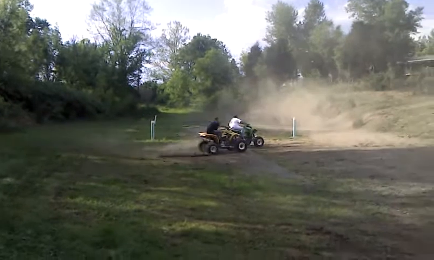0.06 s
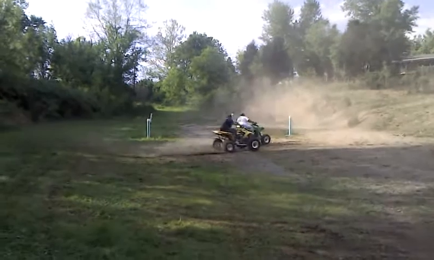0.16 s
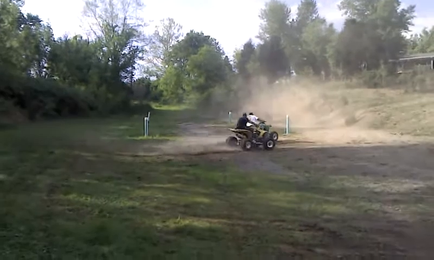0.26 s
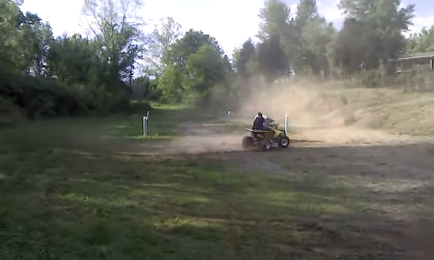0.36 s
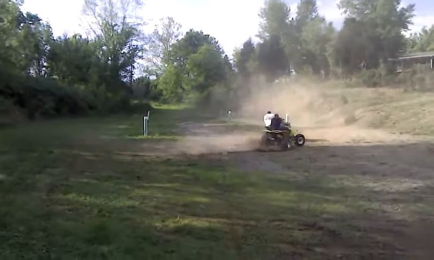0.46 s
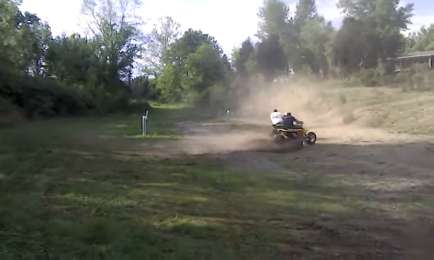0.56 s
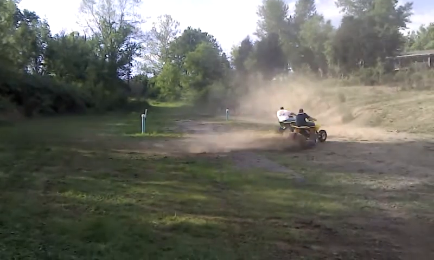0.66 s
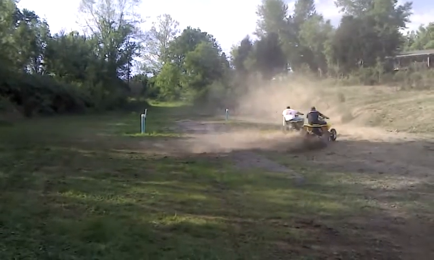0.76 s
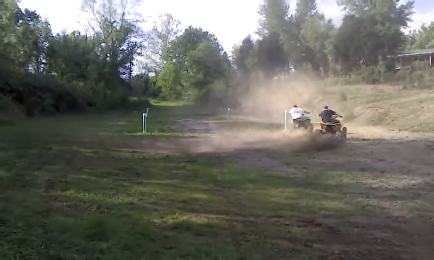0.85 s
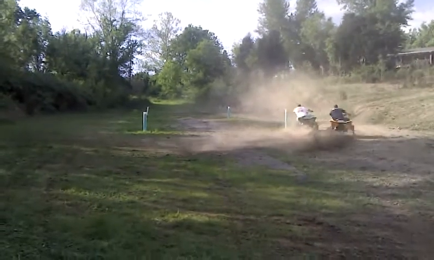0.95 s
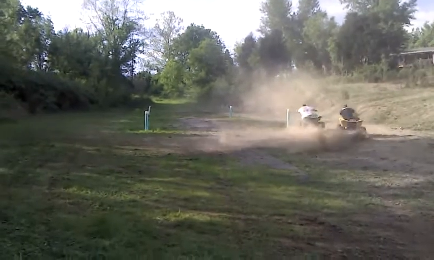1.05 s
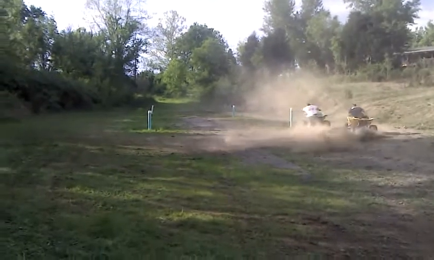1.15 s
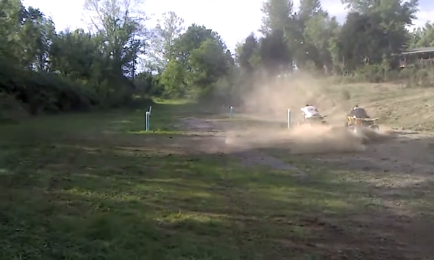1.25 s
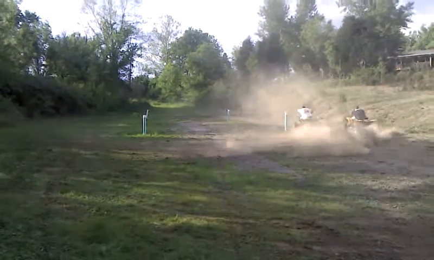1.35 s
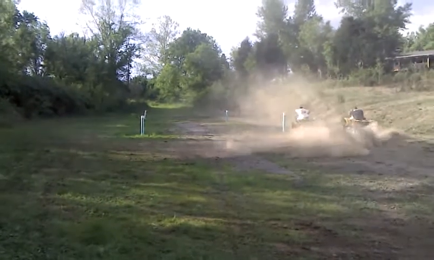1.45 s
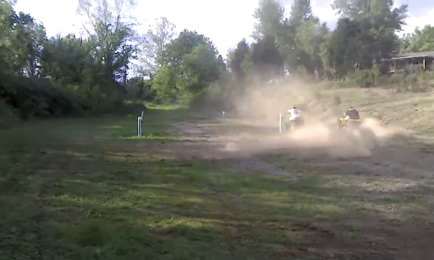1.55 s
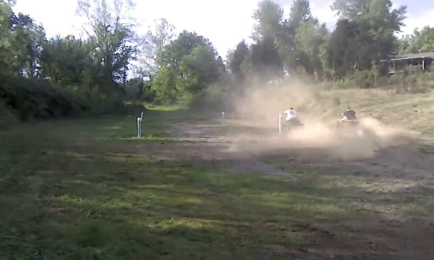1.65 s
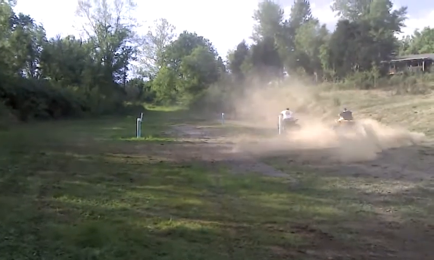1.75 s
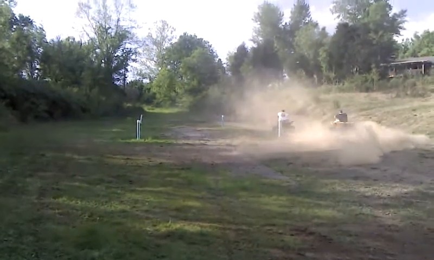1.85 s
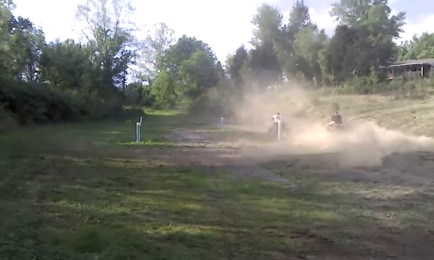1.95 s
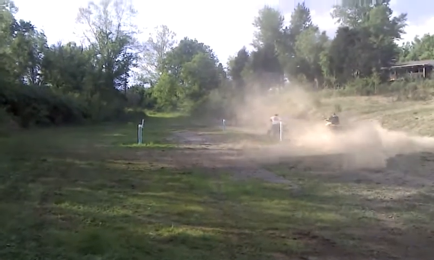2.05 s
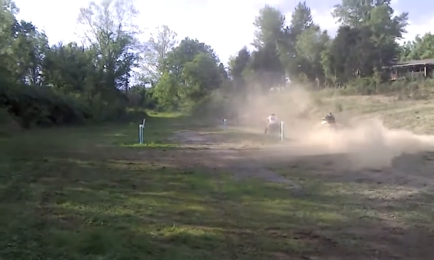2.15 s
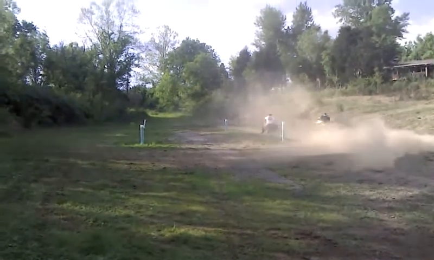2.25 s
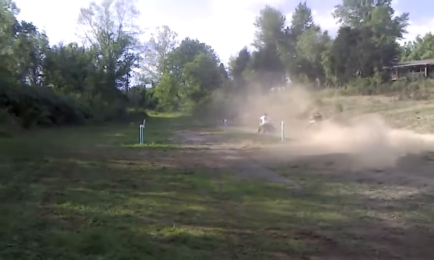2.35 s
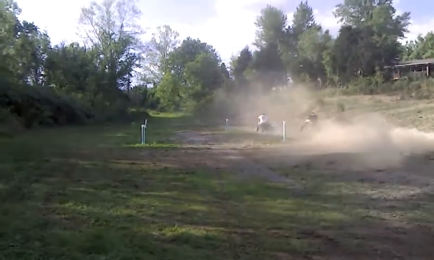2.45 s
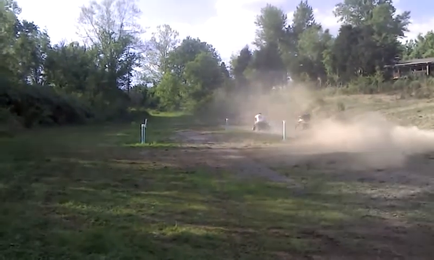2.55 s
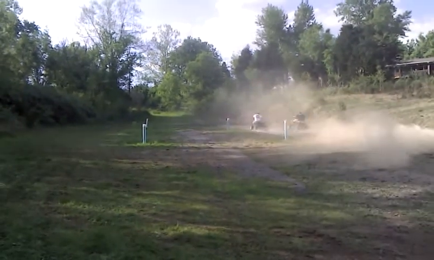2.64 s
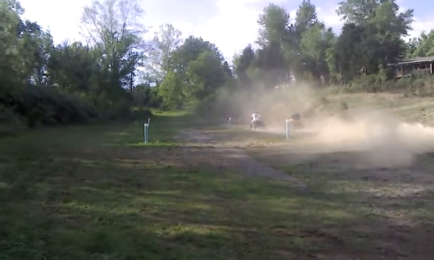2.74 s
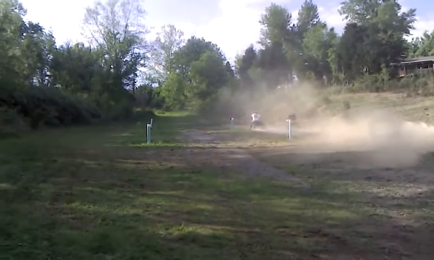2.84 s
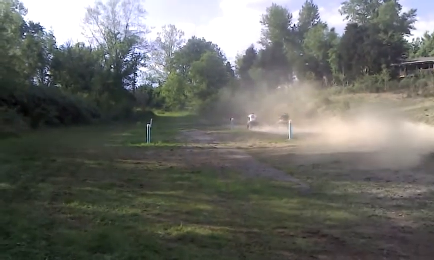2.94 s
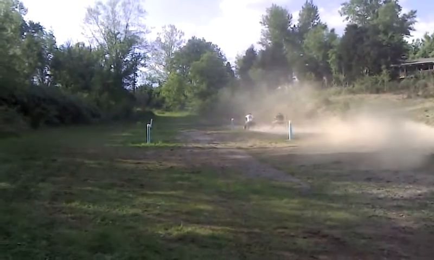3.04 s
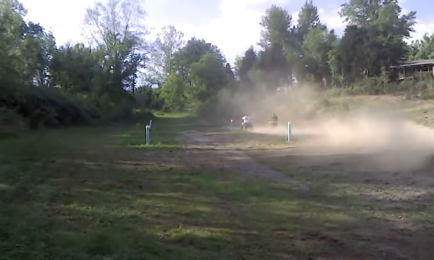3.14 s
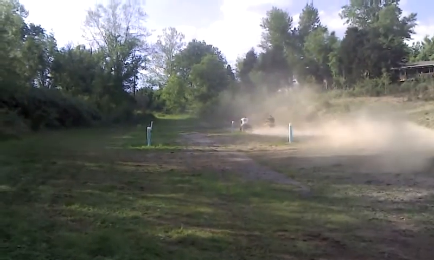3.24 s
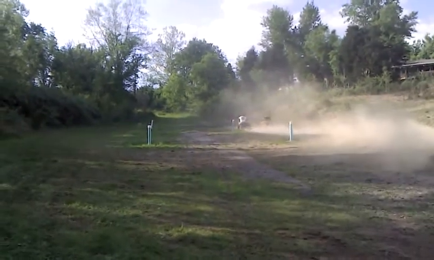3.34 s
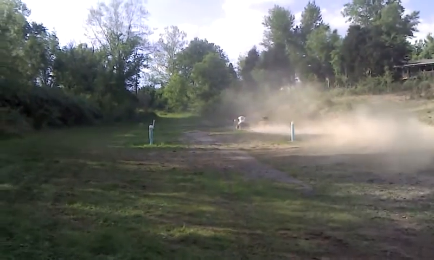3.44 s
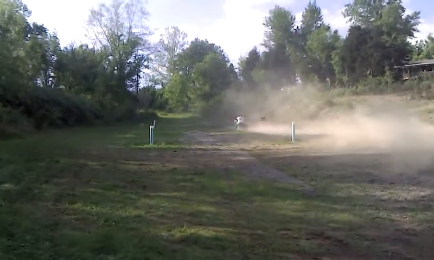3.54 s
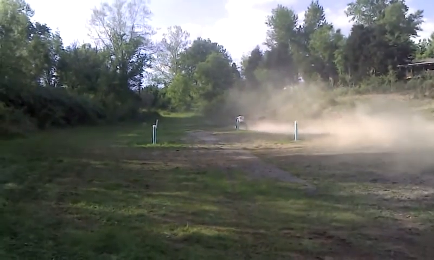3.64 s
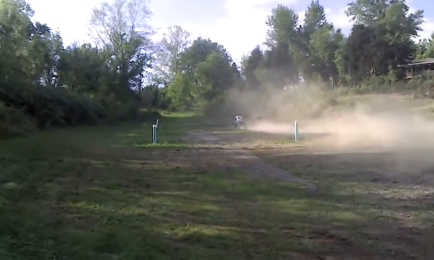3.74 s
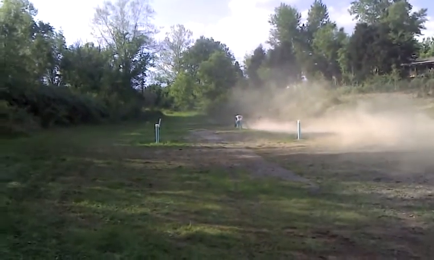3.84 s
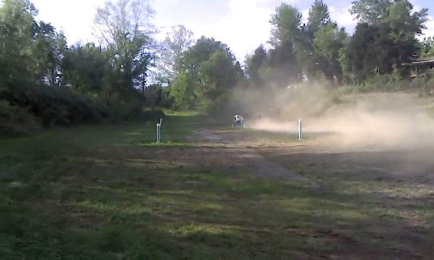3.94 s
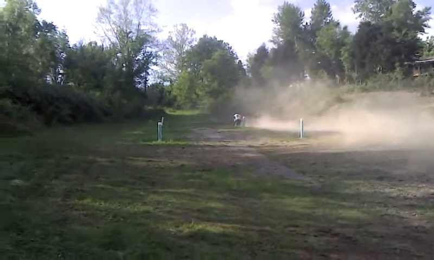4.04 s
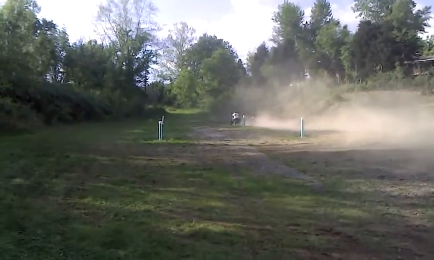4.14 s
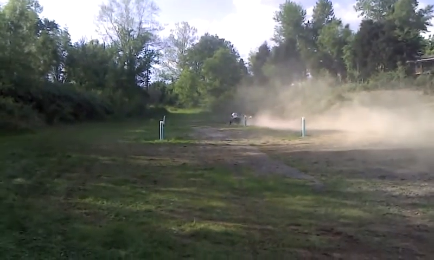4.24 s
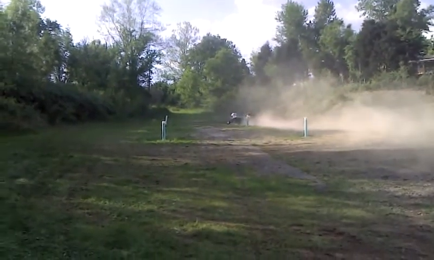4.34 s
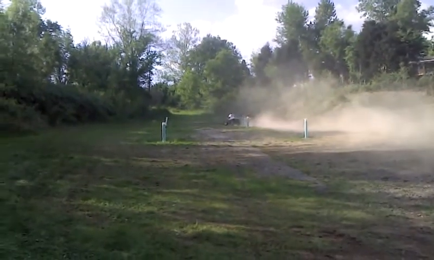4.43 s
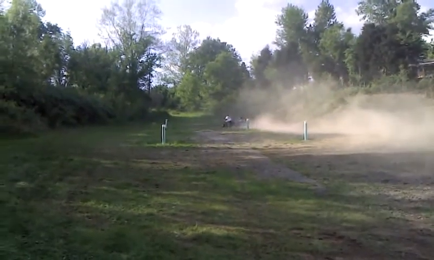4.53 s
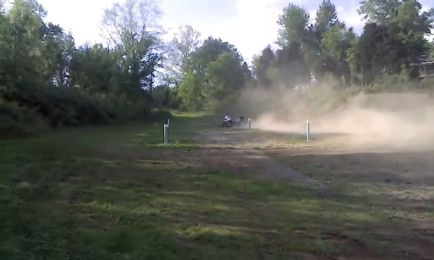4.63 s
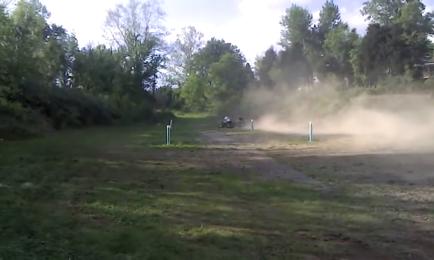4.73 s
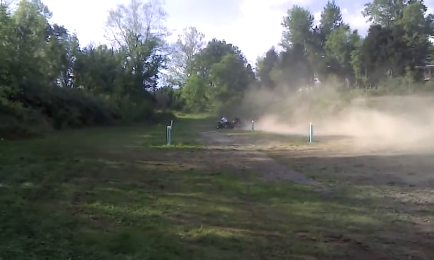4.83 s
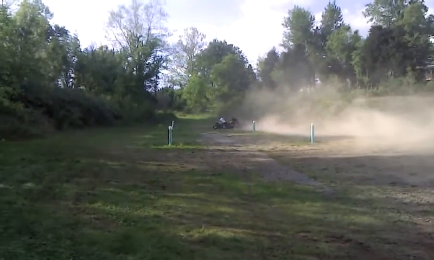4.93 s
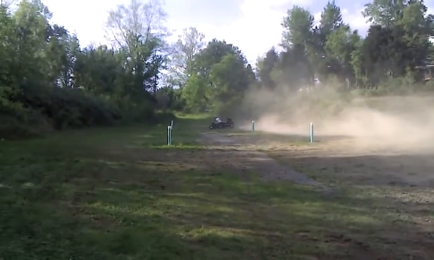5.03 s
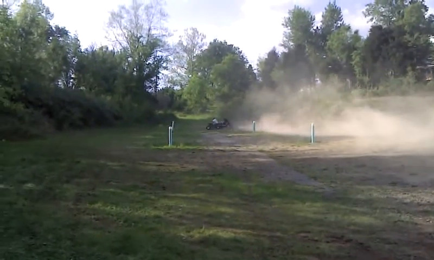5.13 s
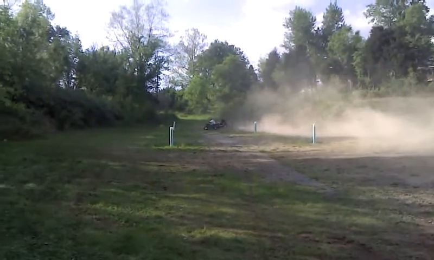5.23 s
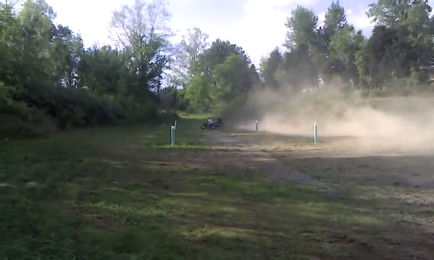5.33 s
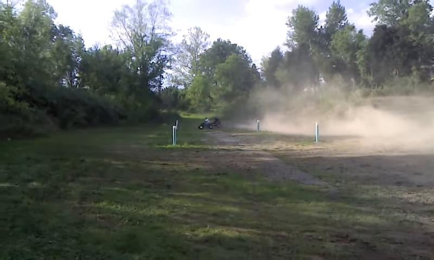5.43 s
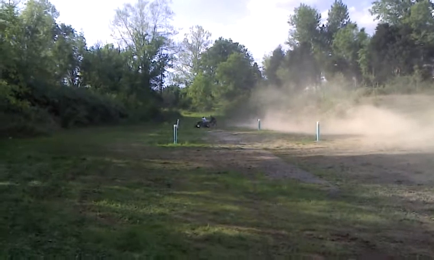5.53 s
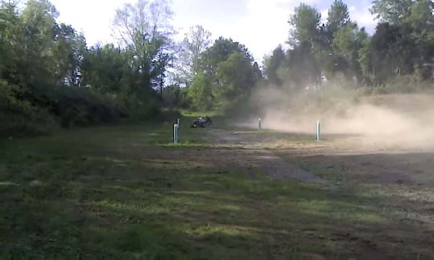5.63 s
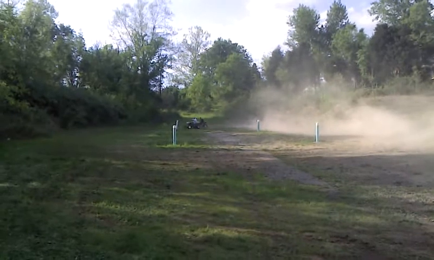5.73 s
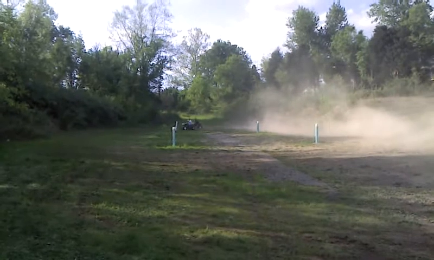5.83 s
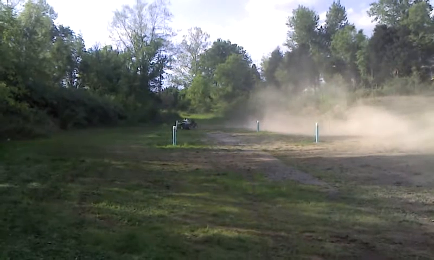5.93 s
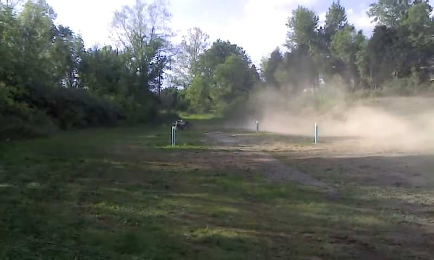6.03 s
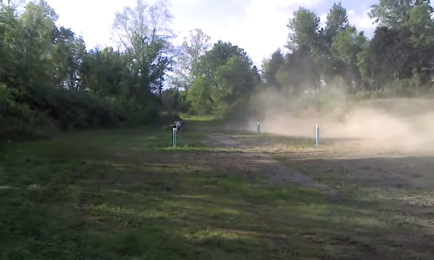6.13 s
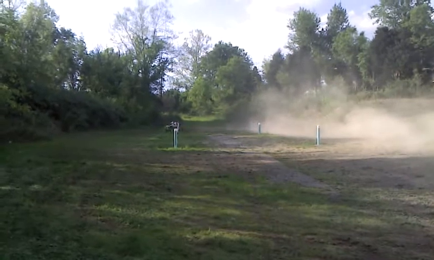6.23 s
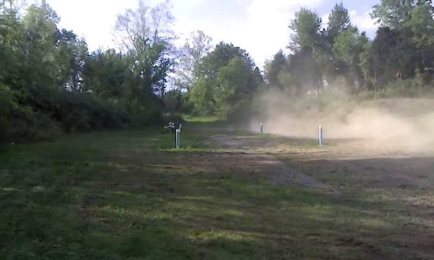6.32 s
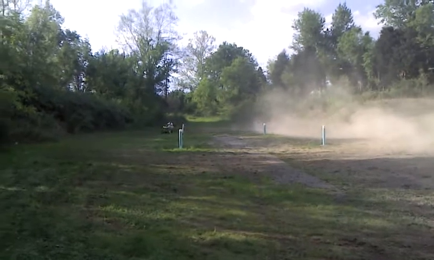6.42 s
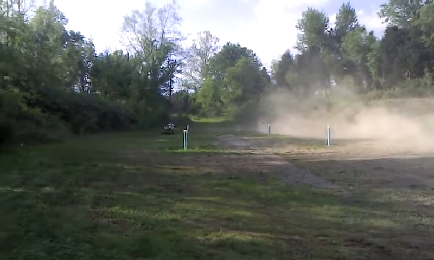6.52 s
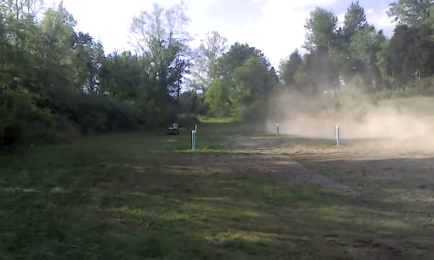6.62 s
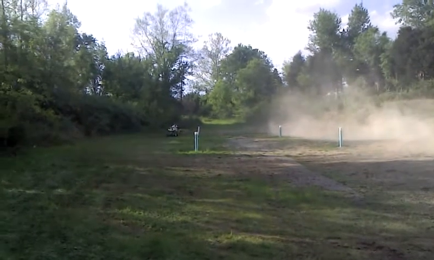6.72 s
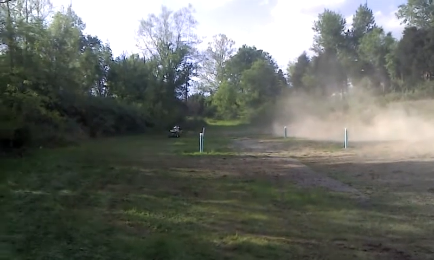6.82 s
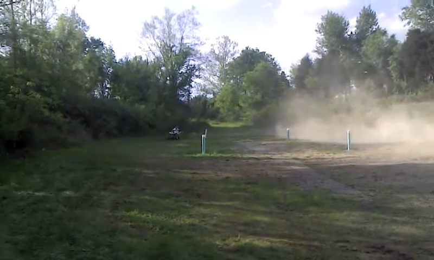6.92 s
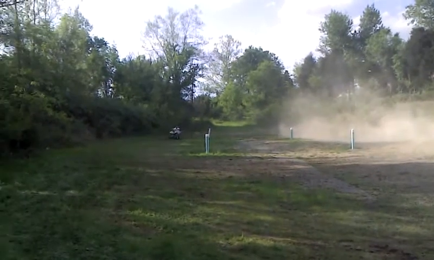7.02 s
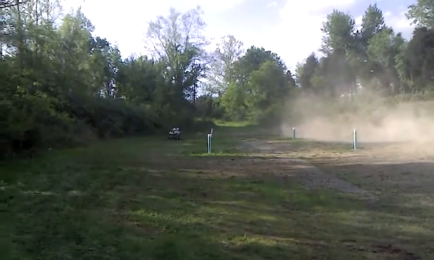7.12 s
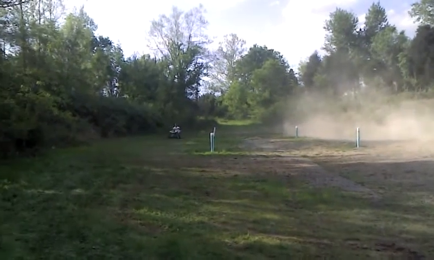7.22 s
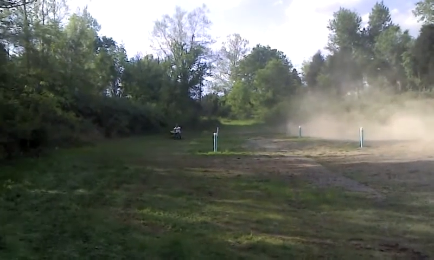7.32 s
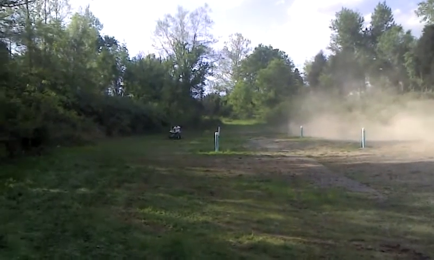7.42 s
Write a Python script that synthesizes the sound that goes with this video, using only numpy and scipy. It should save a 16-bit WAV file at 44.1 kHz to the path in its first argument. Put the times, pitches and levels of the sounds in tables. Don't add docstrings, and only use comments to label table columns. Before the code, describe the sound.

Two single-cylinder quad bikes accelerate away over soft ground, their low exhaust thumps overlapping with a gritty growl and fizzing rasp. The revs rise through a gear change, then the throttles shut and the sound drops to a dull far-off mutter before picking up again. Trees return a short echo. The small narrow-band microphone crackles and clips on the hardest early blows.

```python
import sys
import numpy as np
from scipy import signal
from scipy.fft import rfft, irfft, next_fast_len
from scipy.io import wavfile
from scipy.ndimage import uniform_filter1d, minimum_filter1d, map_coordinates

SR = 44100
rng = np.random.default_rng(int(sys.argv[2]) if len(sys.argv) > 2 else 0)


def inscribe(sig):
    pcm = np.round(np.clip(np.atleast_2d(sig).T, -1, 1) * 32767)
    wavfile.write(sys.argv[1], SR, pcm.astype(np.int16))


def field_ratio(decibels):
    return 10 ** (np.asarray(decibels, dtype=float) / 20)


N = 329868
TIME = np.arange(N) / SR
CEILING = 0.71


def unit(x):
    return x / np.sqrt(np.mean(x ** 2) + 1e-20)


def even(x):
    return x / np.sqrt(np.abs(uniform_filter1d(x ** 2, SR // 4)) + 1e-14)


def along(points, hz):
    f, value = np.transpose(points)
    return np.interp(np.log(hz + 1), np.log(f + 1), value)


def curves(rows):
    s, *columns = np.transpose(rows)
    return [np.interp(TIME, s, column) for column in columns]


def wobble(rate):
    knots = rng.standard_normal(int(N * rate / SR) + 4)
    return map_coordinates(knots, [np.arange(N) * rate / SR])


def filtered(x, response):
    m = 2 * next_fast_len(N // 2 + SR // 4)
    gain = response(np.fft.rfftfreq(m, 1 / SR))
    gain = gain / np.sqrt(np.mean(np.abs(gain) ** 2))
    return irfft(rfft(x, m) * gain, m)[..., :N]


def resonance(hz, centre_hz, width_hz):
    return 1j * hz * width_hz / (centre_hz ** 2 - hz ** 2 + 1j * hz * width_hz)


def noise(spectrum, patchy_db=0):
    z = signal.stft(rng.standard_normal(N), nperseg=512)[2]
    field = uniform_filter1d(rng.standard_normal(z.shape), 4, 0)
    field = uniform_filter1d(field, 9, 1)
    clumped = signal.istft(z * field_ratio(patchy_db * unit(field)), nperseg=512)[1][:N]
    return filtered(unit(clumped), lambda hz: field_ratio(along(spectrum, hz)))


def firings(speed, first):
    ruts = (TIME > 4.9) * np.cos(2 * np.pi * (TIME - 5.25) / 0.43)
    rate = curves(speed)[0] + 0.8 * ruts
    at = np.flatnonzero(np.diff(np.floor(first + np.cumsum(rate) / SR)))
    chance = rng.standard_normal((len(at), 2))
    jitter_s, scatter_db = 0.0001, 1
    at = np.clip(at + np.round(jitter_s * SR * chance[:, 0]).astype(int), 0, N - 1)
    size = np.sqrt(SR / rate[at]) * field_ratio(scatter_db * chance[:, 1])
    return np.bincount(at, size, N)


# f/Hz, level/dB
GRASS_PATH = [(10, -71.5), (35, -45), (50, -11.5), (70, -10.5), (100, 8), (330, 0.5), (450, -6), (560, -26),
              (2000, -37)]


def blow_colour(hz):
    lead = 2 * np.arctan2(70 * hz, hz ** 2 - 70 ** 2) - 1
    return field_ratio(along(GRASS_PATH, hz)) * np.exp(1j * lead)


# f/Hz, width/octaves, level/dB
PIPE_RESONANCES = [
    (70, 0.25, -0.3),
    (135.2, 0.34, -0.5),
    (242, 0.32, 0.18),
    (414.3, 0.39, 2.5),
]
SHUT_THROTTLE = [
    -2,
    3,
    -12.5,
    -33,
]


def engine(speed, first, thump, silencer_db, tune):
    level_db, throttle = curves(thump)
    turned_db = 7 * np.clip((TIME - 4.8) / 0.28, 0, 1)
    blows = firings(speed, first)
    thud = np.zeros(N)
    for i, (f, octaves, trim_db) in enumerate(PIPE_RESONANCES):
        own_db = silencer_db[i] + SHUT_THROTTLE[i] * (1 - throttle) + trim_db
        mode_db = level_db + own_db + 2.2 * wobble(6)
        if i == 0:
            mode_db = mode_db + turned_db

        def ring(hz):
            distance_octaves = np.log2((hz + 1) / (tune * f))
            return blow_colour(hz) * np.exp(-0.5 * (distance_octaves / octaves) ** 2)

        thud += filtered(blows * field_ratio(mode_db), ring)
    return thud, blows * field_ratio(level_db)


# t/s, rate/firings per s
LEAD_SPEED = [(0.0, 42.1), (0.21, 41.35), (0.431, 48.0), (0.631, 47.7), (0.777, 52.39), (1.413, 52.23),
              (1.674, 59.31), (1.867, 57.76), (2.066, 61.67), (2.448, 61.59), (2.659, 65.24),
              (2.928, 51.03), (3.175, 51.94), (3.541, 45.74), (4.7, 35.35), (5.959, 35.09), (6.217, 43.43),
              (7.48, 45.17)]
# t/s, level/dB, throttle and heading/1 open towards - 0 shut or away
LEAD_THUMP = [(0, -34, 0.9), (0.218, -30.5, 0.88), (.42, -16.5, 0.7), (0.648, -19, 0.86), (.85, -24.5, 0.9),
              (1.2, -22, 0.94), (1.801, -24, 0.97), (2.202, -23.5, 0.83), (2.699, -29.5, 1.065),
              (2.949, -32, 0.83), (3.802, -29.5, 0.13), (4.602, -31.5, 0.071), (4.85, -44, 0.42),
              (5.398, -47.5, 0.97), (5.801, -37.5, 0.56), (6.249, -36.5, 0.79), (6.9, -34.5, 0.86),
              (7.48, -31, .75)]
LEAD_SILENCER = [-14, -0.5, -2, -1]


def lead_bike():
    return engine(LEAD_SPEED, -0.06, LEAD_THUMP, LEAD_SILENCER, tune=0.95)


# t/s, rate/firings per s
CHASE_SPEED = [(0.0, 37.47), (0.381, 39.16), (0.648, 33.1), (0.948, 42.63), (1.228, 43.05), (1.492, 36.88),
               (1.775, 34.47), (2.103, 42.22), (2.461, 42.94), (2.734, 47.17), (3.001, 37.46),
               (3.181, 38.62), (4.678, 30.23), (5.175, 37.8), (5.349, 35.59), (5.835, 37.4), (6.696, 43.29),
               (7.48, 43.99)]
# t/s, level/dB, throttle and heading/1 open towards - 0 shut or away
CHASE_THUMP = [(0, -24.5, 0.73), (0.221, -25.5, .7), (0.402, -23.5, 0.96), (.62, -23.5, 0.71),
               (0.899, -24, 0.78), (1.402, -25, 0.96), (1.902, -29, 1), (2.4, -25.5, 0.97),
               (2.748, -24, .8), (3, -33, 0.14), (3.8, -34.5, 0.41), (4.551, -34, .2), (4.851, -39.5, 0.43),
               (5.05, -37.5, 0.64), (5.401, -39.5, 0.13), (5.902, -46, .9), (6.799, -41.5, 0.66),
               (7.48, -40.5, 0.85)]
CHASE_SILENCER = [-6, -1, 1, -2]


def chase_bike():
    return engine(CHASE_SPEED, -0.26, CHASE_THUMP, CHASE_SILENCER, tune=0.98)


# t/s, far/0 close - 1 far, echo level/dB
DISTANCE_PATH = [(0, .5, -12), (.35, 0, -13), (2.4, 0, -14), (2.82, 0, -18), (2.88, 1, -15), (4.6, 1, -14),
                 (4.9, 1, -9), (6, 1, -9), (6.3, 1, -12), (7.48, 1, -12)]


def distance():
    return curves(DISTANCE_PATH)


def puffs(blows, far):
    t = np.arange(SR // 25) / SR
    puff = (1 - np.exp(-t / 0.00084)) * np.exp(-t / 0.0035)
    lead = round(0.0027 * SR)
    gate = np.sqrt(np.abs(signal.fftconvolve(blows ** 2, puff ** 2)[lead:lead + N]))
    smear = 0.15 + 0.33 * far
    return np.sqrt((1 - smear) * even(gate) ** 2 + smear)


# f/Hz, level/dB per Hz
FIZZ_CLOSE = [(760, -37.5), (1300, -9.5), (1460, -1.5), (1640, -5.5), (1920, 0.5), (2280, -5.5), (2750, -2),
              (3230, -9), (3730, -10), (4130, -19.5), (5370, -64.5), (9090, -120)]
# f/Hz, level/dB per Hz
FIZZ_DISTANT = [(760, -21.5), (1300, -9), (1750, -5), (2120, -4.5), (2740, -4.5), (3100, -5.5), (3820, -14),
                (4130, -22.5), (5370, -57), (9090, -120)]


def fizz(gate, far, centre_hz):
    hiss = noise(FIZZ_CLOSE, patchy_db=2)
    near = np.zeros(N)
    for f, width_hz in [(1600, 500), (2150, 640), (2800, 230)]:
        share = np.clip(1 - np.abs(centre_hz - f) / 620, 0, 1) ** 0.5
        near += share * filtered(hiss, lambda hz: 0.26 + resonance(hz, f, width_hz))
    thin = noise(FIZZ_DISTANT, patchy_db=2.5)
    aimed = 1 + 3 * np.exp(-((TIME - 5.97) / 0.45) ** 4)
    ring = unit(filtered(thin, lambda hz: resonance(hz, 2100, 170)))
    distant = unit(thin) + 0.3 * aimed * ring
    return gate * even((1 - far) * even(near) + far * unit(distant))


# f/Hz, level/dB per Hz
GROWL_CLOSE = [(310, -19), (520, 2.5), (590, -4), (1010, 2), (1290, -2), (1460, -8.5), (1600, -23),
               (2080, -34.5), (3520, -120)]
# f/Hz, level/dB per Hz
GROWL_DISTANT = [(310, -32.5), (520, 4), (585, -8.5), (625, -4), (743, -8.5), (1040, -4), (1190, -4.5),
                 (1600, -14), (2080, -41), (3520, -120)]


def growl(gate, far, sharp_blows):
    def silencer(hz):
        return field_ratio(along(GROWL_CLOSE, hz)) * np.exp(-1j * np.pi * 0.004 * (hz - 750) ** 2 / 800)

    crack = even(filtered(sharp_blows, silencer))
    near = 0.55 * gate * noise(GROWL_CLOSE, patchy_db=2) + 0.85 * crack
    hollow = filtered(noise(GROWL_DISTANT, patchy_db=1.5), lambda hz: 1 + 1.3 * resonance(hz, 737, 120))
    return even((1 - far) * near + far * gate * unit(hollow))


# t/s, level/dB, fizz centre f/Hz
GAS_FLOW = [(0, -40.5, 2010), (.2, -45.5, 2050), (.44, -33, 2080), (.9, -30.5, 1960), (1.15, -34, 1983),
            (1.7, -30, 1950), (2.05, -25.5, 2150), (2.72, -28.5, 2450), (2.82, -34.5, 2520),
            (2.9, -45.5, 2320), (3.25, -53.5, 2200), (4.2, -56, 2200), (4.85, -63, 2200),
            (5.25, -63.5, 2200), (5.55, -57, 2200), (5.87, -58.5, 2200), (6.3, -52, 2200),
            (7.48, -49.5, 2200)]


def rasp(blows, sharp_blows):
    flow_db, centre_hz = curves(GAS_FLOW)
    far, _ = distance()
    gust_db = 1.4 + 0.4 * far
    fizz_db = flow_db + gust_db * wobble(14) - 0.06
    ahead = np.minimum(np.arange(N) + round(0.04 * SR), N - 1)
    above_cruise = np.minimum(curves(LEAD_SPEED)[0] - 50, 6.3)
    yield_db = -0.6226 * (1 - far) * above_cruise
    growl_db = flow_db[ahead] + gust_db * wobble(14) + 0.33 + yield_db - 1.42
    gate = puffs(blows, far)
    return field_ratio(growl_db) * growl(gate, far, sharp_blows) + field_ratio(fizz_db) * fizz(gate, far, centre_hz)


# f/Hz, t/s
TREE_DECAY = [
    (80, 0.71),
    (400, 0.74),
    (3000, 0.1),
]


def trees(x):
    hz, t, z = signal.stft(rng.standard_normal(SR // 2), SR, nperseg=1024)
    decay = field_ratio(-60 * t / along(TREE_DECAY, hz)[:, None])
    tail = signal.istft(z * decay, SR, nperseg=1024)[1]
    delayed = np.pad(x, (1500, 0))
    return signal.fftconvolve(delayed, tail / np.linalg.norm(tail))[:N]


# f/Hz, level/dB per Hz
FIELD_AIR = [(15, -51), (25, -22.5), (58, -4.5), (150, -2.5), (262, -7), (332, -9.5), (591, -30),
             (1550, -47.5), (3000, -37), (3710, -30), (4130, -52.5), (5370, -80.5), (9090, -120)]


def field_air():
    return field_ratio(-50) * noise(FIELD_AIR)


def duck(x):
    span = round(0.006 * SR)
    needed = np.minimum(1, 0.67 / (np.abs(x) + 1e-9))
    return x * uniform_filter1d(minimum_filter1d(needed, 2 * span), span)


def narrow_band(x):
    m = next_fast_len(N)
    passed = np.fft.rfftfreq(m, 1 / SR) < 4300
    return irfft(rfft(x, m) * passed, m)[:, :N]


# t/s, click level/dB
HARD_FIRINGS = [(0.399, -45.5), (0.4367, -41.5), (0.4791, -38), (0.5198, -57), (0.541, -45.5),
                (0.5647, -45), (0.5823, -37), (0.6471, -46.5), (0.7115, -49), (0.7283, -45.5), (0.766, -37),
                (0.938, -48.5), (1.055, -45), (1.1483, -42.5), (1.7506, -30), (1.9727, -25),
                (2.1885, -45.5), (2.3954, -41)]


def surges(x):
    surge = 0.0022 * SR
    reach = round(3 * surge)
    bell = np.exp(-0.5 * (np.arange(-reach, reach) / surge) ** 2)
    smooth = round(0.0006 * SR)
    thump = uniform_filter1d(uniform_filter1d(x[0], smooth), smooth)
    swell = np.zeros(N)
    for s, click_db in HARD_FIRINGS:
        middle = round(s * SR) + reach // 8
        near = slice(middle - reach, middle + reach)
        height = np.abs(thump[near] * bell)
        top = np.argmax(height)
        target = CEILING * field_ratio(np.clip(0.052 * (click_db + 51), 0.25, 1.6))
        wanted = target - x[0, near][top] * np.sign(thump[near][top])
        swell[near] += np.clip(wanted / height[top], 0, 1.8) * bell
    return x + swell * thump


def scene():
    lead, lead_blows = lead_bike()
    chase, chase_blows = chase_bike()
    gas = rasp(lead_blows + chase_blows, lead_blows + 0.45 * chase_blows)
    bikes = lead + chase + gas
    _, echo_db = distance()
    echo = trees(field_ratio(echo_db) * bikes)
    return (bikes + echo + field_air())[None]


def band_limit(x):
    return signal.sosfilt(signal.butter(12, 15850, fs=SR, output="sos"), x)


def record(dry):
    heard = surges(narrow_band(duck(dry)))
    return band_limit(np.clip(heard, -CEILING, CEILING))


dry = scene()
out = record(dry)
inscribe(out)
```